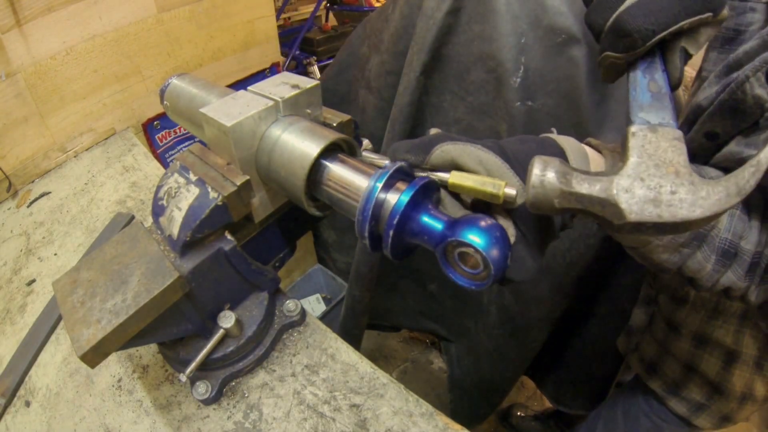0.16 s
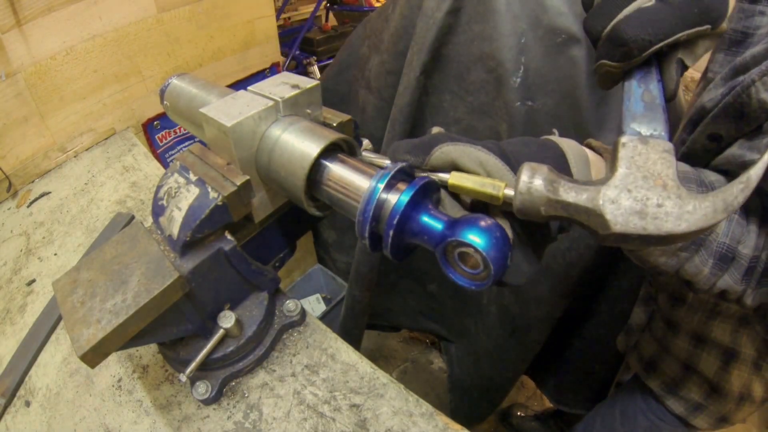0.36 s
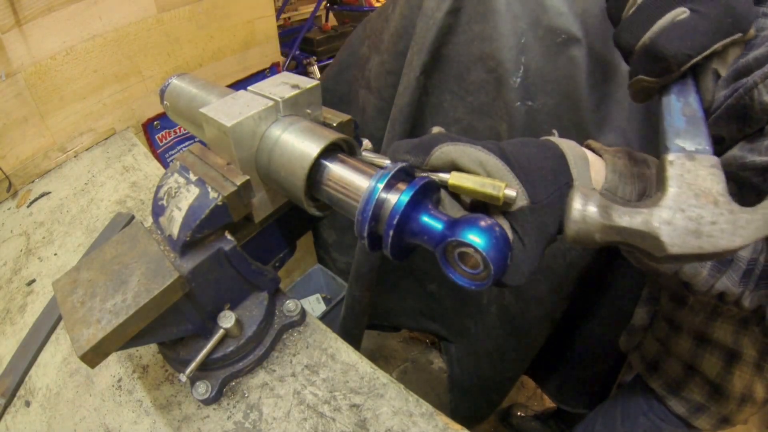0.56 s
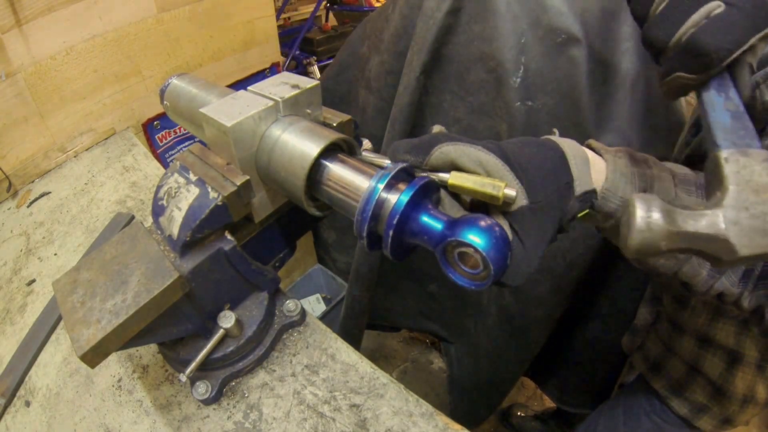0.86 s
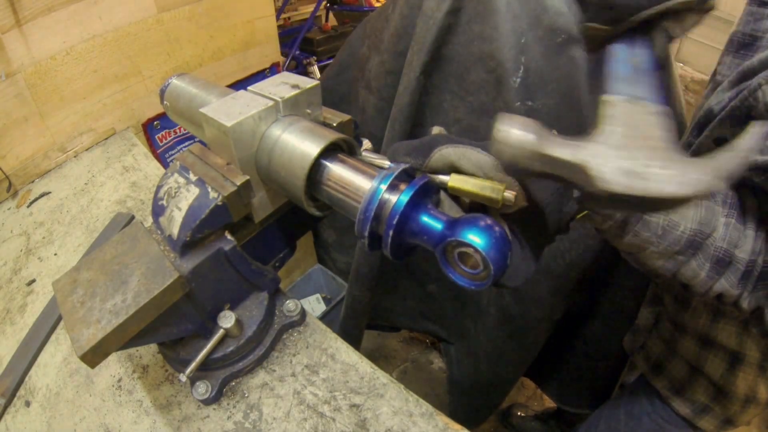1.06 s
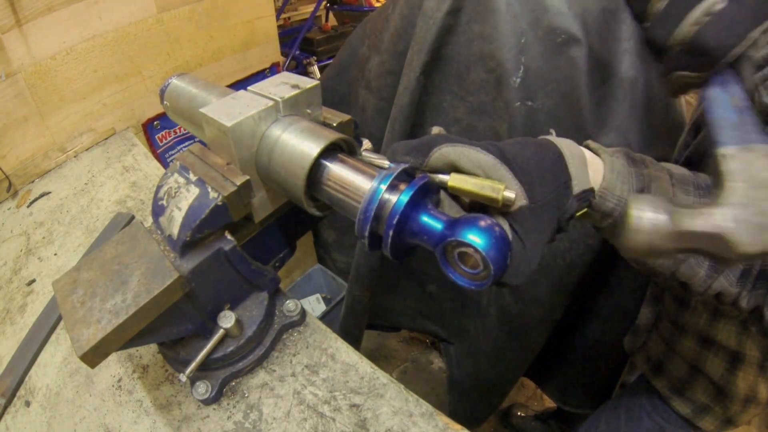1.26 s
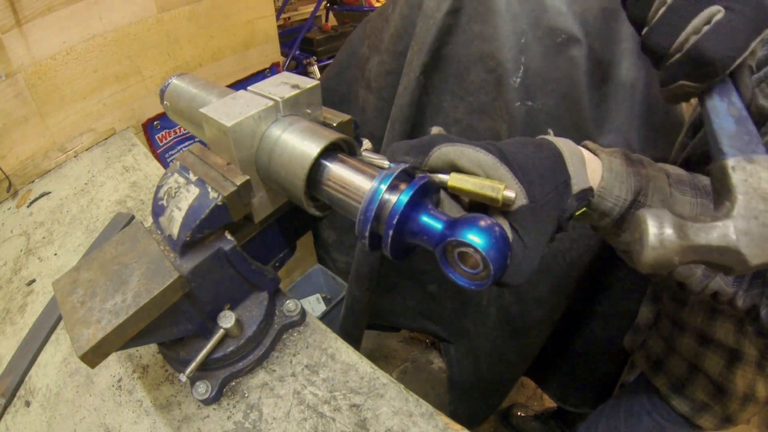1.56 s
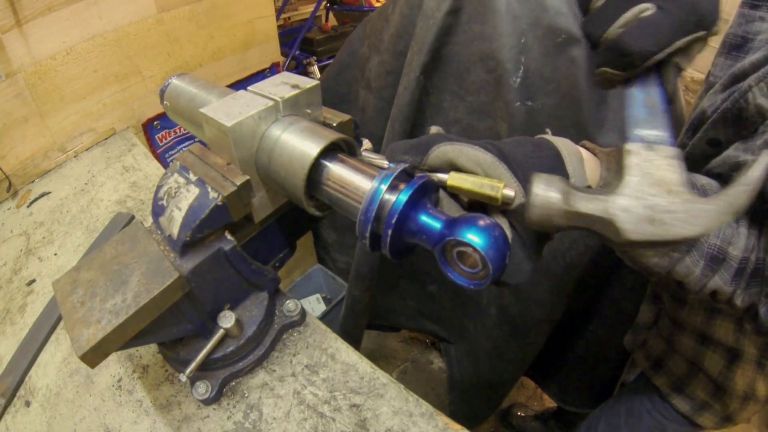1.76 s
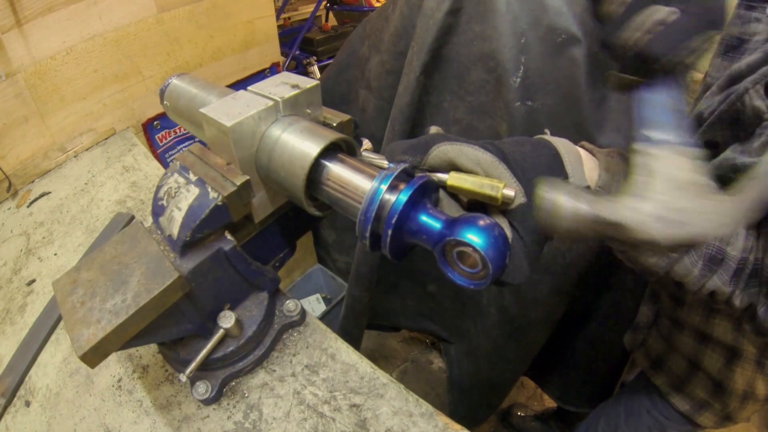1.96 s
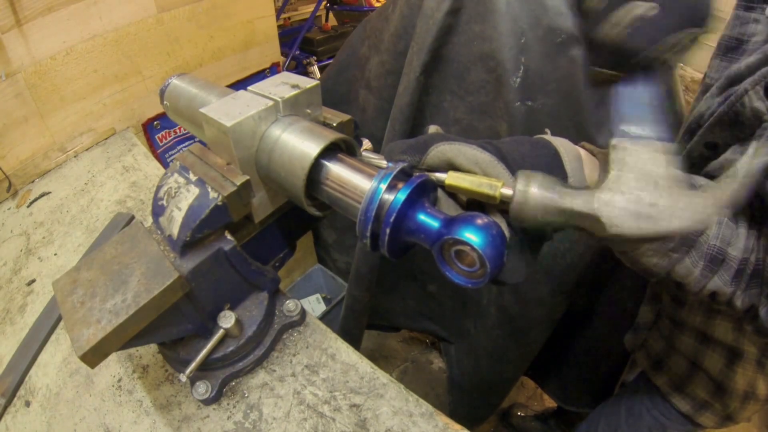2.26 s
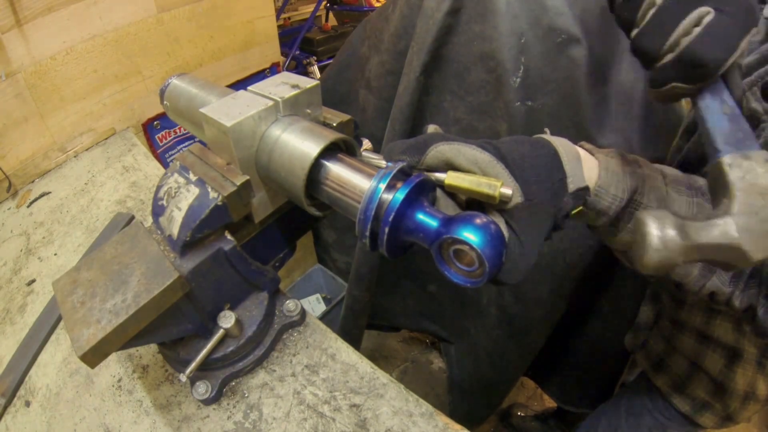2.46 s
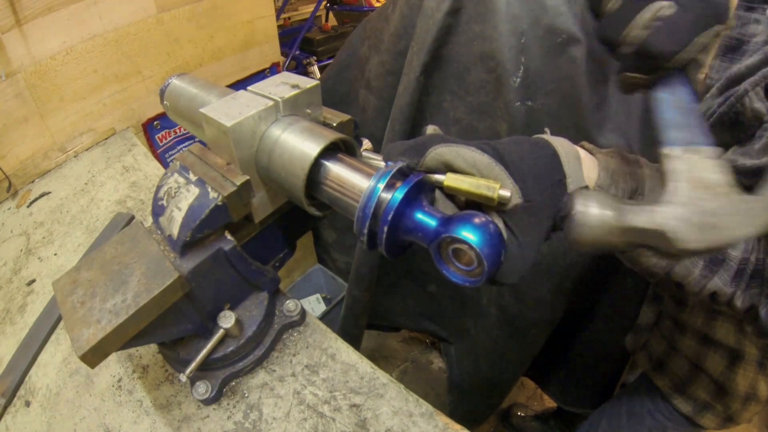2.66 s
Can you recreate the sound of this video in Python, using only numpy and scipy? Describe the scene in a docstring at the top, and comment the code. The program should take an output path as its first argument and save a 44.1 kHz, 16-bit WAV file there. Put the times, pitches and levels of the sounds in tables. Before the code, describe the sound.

A hammer strikes a metal punch against a part in a bench vise: one light tap, then seven strong, quickening clacks with hollow knocks and low bench thuds, close up in a small workshop, mono.

```python
"""Hammer and punch at the vise

A hammer taps a hand-held punch eight times against a metal collar on a part clamped in a bench vise.
Short contact modes make the crack, banded noise the dense clack and room tail, sines the ringing metal.
Swelling low modes give the hollow knock and, a moment later, the thud of the workbench.
The first tap is light and the last four crack harder; shaped noise and a faint machine hum lie beneath."""
import sys
import numpy as np
from scipy import signal
from scipy.fft import rfft, irfft
from scipy.io import wavfile
from scipy.ndimage import uniform_filter1d

SR = 44100
rng = np.random.default_rng(int(sys.argv[2]) if len(sys.argv) > 2 else 0)


def generate_wav(sig):
    """Save sig (samples, or channels by samples) to the path in sys.argv[1] as 16-bit PCM at SR."""
    pcm = np.round(np.clip(np.atleast_2d(sig).T, -1, 1) * 32767).astype(np.int16)
    wavfile.write(sys.argv[1], SR, pcm)


N = 123479
T = np.arange(N) / SR
BLOW_T = T[:20480]  # time axis for the sounds of one blow, s

# spectrum of the room noise, relative: (f/Hz, level per Hz/dB)
AIR_SPECTRUM = [(20, -10.5), (38, 2), (60, -11), (150, -19.5), (240, -12), (500, -15), (900, -13.5),
                (1300, -23), (1800, -18.5), (3300, -28.5), (5700, -42.5), (9400, -51), (10400, -47.5),
                (11400, -55.5), (15000, -53.5)]
# steady tones of a running machine, before the background fader: (f/Hz, rms level/dB)
HUM_TONES = [(37.7, -53), (339.1, -54), (452.2, -55.5), (683.7, -57.5)]
# fader on the whole background, which sinks: (t/s, level/dB)
BACKGROUND_FADER = [(0, 1), (.6, 0.5), (1.3, 0.5), (1.9, 0), (2.8, -2.5)]
# each tap against a usual tap: (t/s, then level/dB at each of the register centres)
TAP_STRENGTHS = [(0.298, -11, -11.0, -4.5, -11, -20.5, -13, -17, -15.5, -23),
                 (0.6383, 2.5, 2.5, 5, 2.5, -1.5, 6, 0.5, 5, 7),
                 (0.9577, -0.5, 0.1, 2.5, 4.5, 0.5, 4.5, 10, -1.3, 5.5),
                 (1.3579, 2, 1.2, 2.5, 3.5, 1.7, 0, 0.4, -4, -3),
                 (1.6721, -0.2, 5.5, 0.4, 3, -2, -0.3, -4, 4.3, -4),
                 (1.9806, 1.1, 2.3, -2.7, -0.5, -0.4, 0.3, -1.3, 1, 2.5),
                 (2.2679, -0.3, 0, -5.2, -1.3, -0.8, 0.3, 1.8, -0.7, 5.5),
                 (2.5384, -0.7, -3.5, -7.5, -2.5, -3, -2, 1.2, 1, 3)]
# centres of the nine registers: (f/Hz)
REGISTER_CENTRES_HZ = [70, 240, 530, 1000, 1700, 3100, 6000, 8900, 12400]
# how squarely each tap lands:
# (crack level/dB, hollow knock level/dB, lingering ring level/dB, time the punch takes to seat t/s)
TAP_SEATING = [(-10.5, -1.5, -20, .003), (-15, -0.5, -11.5, 0.0015), (-13, 1, -16, .0003),
               (-20.5, -0.5, -12, 0.00071), (-4.5, 0, -2.5, .0001), (-1.5, -4.5, 3, 0.00007),
               (-3, -5, -7, .0001), (-2, -16, -3.5, 0.000083)]
# thud of the workbench: (f/Hz, level/dB, t60 t/s, swell t/s, delay after seating t/s)
BENCH_MODES = [(44.4, -14.2, 0.187, 0.007, 0.0066), (66.1, -18.3, 0.417, 0.039, 0.0136),
               (75.4, -3.0, 0.166, 0.03, 0.0), (84.4, -13.4, 0.217, 0.009, 0.0273),
               (206.1, -21.9, 0.182, 0.003, 0.0026), (235.0, -22.8, 0.314, 0.04, 0.0072),
               (248.4, -13.5, 0.13, 0.002, 0.004)]
# hollow knock of the part in the jaws: (f/Hz, level/dB, t60 t/s, swell t/s)
KNOCK_MODES = [(484.4, -2, 0.062, 0.011), (605, -15, 0.086, 0.02), (700.6, -13.5, 0.09, 0.01)]
# ringing of the clamped metal: (f/Hz, level/dB, t60 t/s)
METAL_MODES = [(592, -37, 0.2), (701, -27.5, 0.24), (849, -29, .2), (1040, -28.5, 0.13), (1575, -21, .05),
               (1740, -19.5, 0.045), (1930, -30.5, 0.13), (2494, -23.5, 0.093), (2731, -31, 0.091),
               (3735, -27.5, 0.079), (3835, -23, 0.059), (5173, -29.5, 0.079), (5390, -27, 0.073),
               (7080, -31.5, 0.062)]
# clack of punch, part and vise, and the room's answer:
# (f/Hz, clack level per Hz/dB, clack t60 t/s, room level per Hz/dB, room t60 t/s)
CLACK_AND_ROOM = [(110.4, -52, 0.23, -50, 0.91), (162, -58, 0.153, -60.5, .4), (205, -48, .2, -49, 0.55),
                  (340, -41.5, 0.079, -55.5, 0.41), (644, -43, 0.13, -54.5, 0.47),
                  (1170, -55, .11, -69.5, 0.48), (1740, -46.5, 0.062, -63, 0.34),
                  (2690, -52, 0.084, -69, 0.4), (4560, -56, 0.06, -77, 0.43),
                  (6560, -64, 0.064, -79.5, 0.3), (9000, -63, 0.039, -84.5, 0.21),
                  (12500, -77, 0.096, -105, 0.59), (15500, -89, .06, -108, 0.23)]
# dead modes of the contact: (f/Hz, level/dB, t60 t/s)
CRACK_MODES = [(970, -2, 0.0044), (1628, -4, 0.011), (1808, -8.5, 0.032), (4230, -12.5, 0.007),
               (7350, -22.5, 0.0017), (11000, -28.5, 0.0017)]

AIR_DB, HUM_WAVER, WAVER_HZ = -45, 0.3, 6  # waver depth is relative for level, radians for phase
RING_HZ, RING_DB, RING_T60_S = 838, -43, 2.06  # level before each tap's own ring level
METAL_VARIES_DB = 1
CLACK_RISE_CYCLES, ROOM_RISE_S = 1.0, 0.0084
CLACK_VARIES = 0.63  # share of the noise power that is new at each tap
SNAP_DB, SNAP_T60_S, SNAP_ABOVE_HZ = 14.5, 0.0055, 7800  # treble burst added on top of the clack
CEILING, CUTOFF_HZ = 0.86, 15200  # the ceiling is in full-scale units


def from_db(db):
    """Decibels to gain."""
    return 10 ** (np.asarray(db) / 20)


def at_hz(points_hz, values, hz):
    """Read a spectrum on a log-frequency axis."""
    return np.interp(np.log(hz), np.log(points_hz), values)


def envelope(t, t60, rise):
    """Swell with time constant rise, then die away by 60 dB per t60."""
    swell = 1 - np.exp(-t / max(rise, 1e-5))
    return swell * from_db(-60 * t / t60)


def mode(t, hz, t60, rise=0):
    """One struck resonance: a decaying sine."""
    return np.sin(2 * np.pi * hz * t) * envelope(t, t60, rise)


def struck(colour, hz, db, t60, rise=0):
    """One resonance, driven as strongly as the tap's colour is in its register."""
    level_db = db + at_hz(REGISTER_CENTRES_HZ, colour, hz)
    return from_db(level_db) * mode(BLOW_T, hz, t60, rise)


def noise(gain_at, size):
    """Noise of rms 1 with the given spectrum."""
    hz = np.fft.rfftfreq(size, 1 / SR) + 0.0011  # keeps clear of zero
    x = irfft(rfft(rng.standard_normal(size)) * gain_at(hz), size)
    return x / x.std()


def band_noise(low, high, size):
    """Noise in one band, its slow swells evened out so that every blow has a steady strength."""
    def band_gain(f):
        detune = (f * f - low * high) / (f * (high - low))
        return 1 / np.sqrt(1 + detune ** 8)
    x = noise(band_gain, size)
    power = uniform_filter1d(x * x, int(3 * SR / (high - low)), mode="wrap")
    return x / np.sqrt(power)


def add(out, sound, s):
    """Mix a sound in at a time in seconds."""
    i = int(s * SR)
    out[i:i + len(sound)] += sound[:N - i]


def room_air():
    """Soft room noise: random air pressure with a falling treble."""
    return from_db(AIR_DB) * noise(lambda f: from_db(at_hz(*np.transpose(AIR_SPECTRUM), f)), N)


def waver():
    """Slow random drift: noise rolled off above a few hertz."""
    return HUM_WAVER * noise(lambda f: 1 / (1 + (f / WAVER_HZ) ** 2), N)


def machine_hum():
    """A machine running: tones whose level and phase waver independently."""
    hum = np.zeros(N)
    for hz, db in HUM_TONES:
        level = from_db(db) * np.sqrt(2) * (1 + waver())  # sqrt(2) takes rms to peak
        hum += level * np.sin(2 * np.pi * (hz * T + rng.random()) + waver())
    return hum


def workshop():
    """Room noise and machine hum under one sinking fader."""
    fader = from_db(np.interp(T, *np.transpose(BACKGROUND_FADER)))
    return fader * (room_air() + machine_hum())


def bench_thud(out, colour, s):
    """The thud spreads through the workbench: its low modes start at different delays and swell."""
    for *row, delay_s in BENCH_MODES:
        add(out, struck(colour, *row), s + delay_s)


def lingering_ring(ring_db):
    """One lightly damped mode that lingers between taps."""
    return from_db(RING_DB + ring_db) * mode(T, RING_HZ, RING_T60_S)


def hollow_knock(colour, knock_db):
    """The part knocks in the jaws: a few swelling resonances."""
    return from_db(knock_db) * sum(struck(colour, *row) for row in KNOCK_MODES)


def ringing_metal(colour):
    """The clamped metal rings in modes whose sign and level vary from tap to tap."""
    ringing = np.zeros(len(BLOW_T))
    for hz, db, t60 in METAL_MODES:
        sign = rng.choice([-1, 1])
        varied_db = db + METAL_VARIES_DB * rng.standard_normal()
        ringing += sign * struck(colour, hz, varied_db, t60)
    return ringing


def clacks():
    """Dense short modes, partly alike at each tap, and the room's tail, as noise bands: a row per tap."""
    t = BLOW_T
    hz, clack_db, clack_t60, room_db, room_t60 = np.transpose(CLACK_AND_ROOM)
    edges = np.geomspace(95, 16000, 27)
    out = np.zeros((len(TAP_STRENGTHS), len(t)))
    for low, high in zip(edges, edges[1:]):
        mid = np.sqrt(low * high)
        shared = band_noise(low, high, len(t))
        own = band_noise(low, high, out.size).reshape(out.shape)
        grain = np.sqrt(1 - CLACK_VARIES) * shared + np.sqrt(CLACK_VARIES) * own

        clack_decay = envelope(t, at_hz(hz, clack_t60, mid), CLACK_RISE_CYCLES / mid)
        clack = from_db(at_hz(hz, clack_db, mid)) * clack_decay
        treble = 1 / (1 + (SNAP_ABOVE_HZ / mid) ** 2)
        clack *= 1 + from_db(SNAP_DB) * envelope(t, SNAP_T60_S, 0) * treble

        room_decay = envelope(t, at_hz(hz, room_t60, mid), ROOM_RISE_S)
        room = from_db(at_hz(hz, room_db, mid)) * room_decay

        strength = from_db([[at_hz(REGISTER_CENTRES_HZ, tap[1:], mid)] for tap in TAP_STRENGTHS])
        # sqrt(bandwidth) turns level per Hz into band level; hypot adds clack and room in power
        out += strength * np.sqrt(high - low) * np.hypot(clack, room) * grain
    return out


def contact_crack(colour, crack_db):
    """The hard contact cracks: resonances that die within milliseconds."""
    return from_db(crack_db) * sum(struck(colour, *row) for row in CRACK_MODES)


def taps():
    """Each blow sounds contact and metal; once the punch is seated, knock and bench follow."""
    out = np.zeros(N)
    for (s, *colour), seating, clack in zip(TAP_STRENGTHS, TAP_SEATING, clacks()):
        crack_db, knock_db, ring_db, seat_s = seating
        seating_swell = envelope(BLOW_T, np.inf, seat_s / 2)  # no decay of its own
        metal = (clack + ringing_metal(colour)) * seating_swell
        bench_thud(out, colour, s + seat_s)
        add(out, lingering_ring(ring_db), s)
        add(out, hollow_knock(colour, knock_db), s + seat_s)
        add(out, contact_crack(colour, crack_db) + metal, s)
    return out


def scene():
    """The taps, close by, over the workshop, in one channel."""
    return (workshop() + taps())[None]


def record(dry):
    """Round the highest peaks, then cut the top of the treble steeply."""
    rounded = dry / (1 + (dry / CEILING) ** 6) ** (1 / 6)
    low_pass = signal.ellip(10, 0.1, 80, CUTOFF_HZ, fs=SR, output="sos")
    return signal.sosfilt(low_pass, rounded)


dry = scene()
out = record(dry)
generate_wav(out)
```